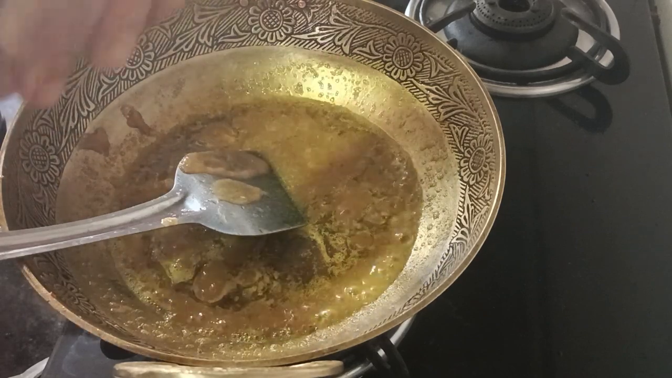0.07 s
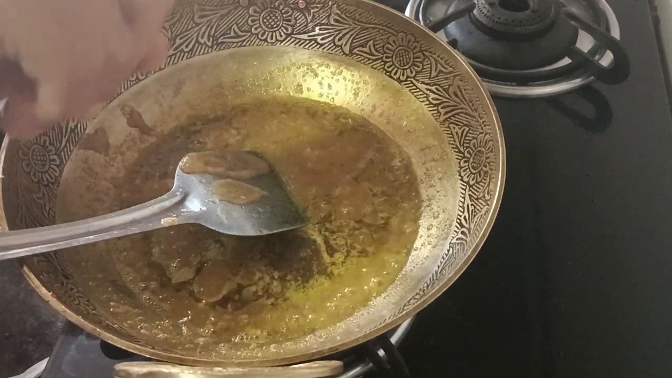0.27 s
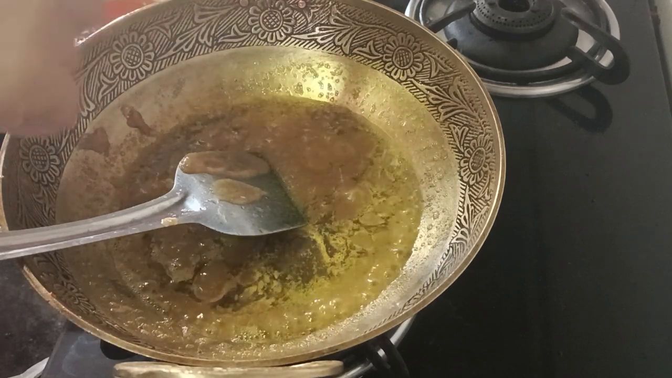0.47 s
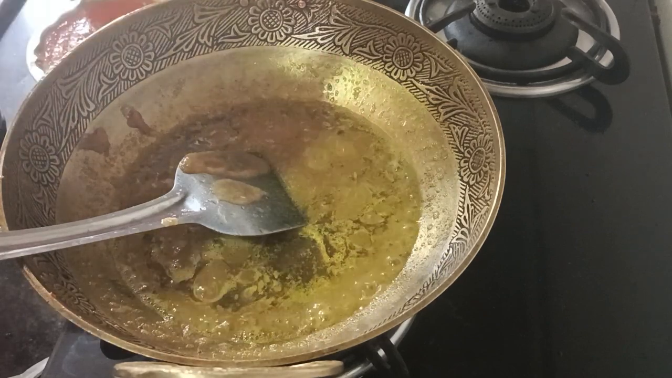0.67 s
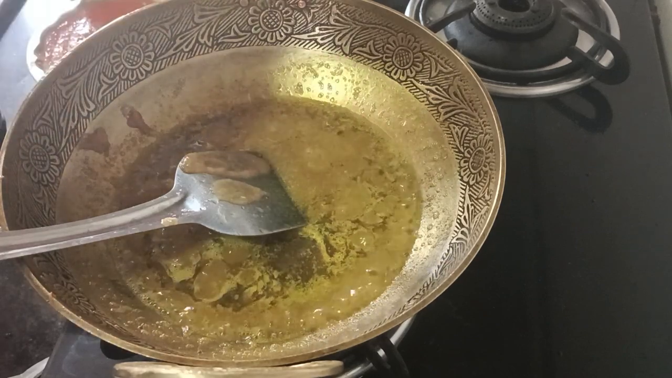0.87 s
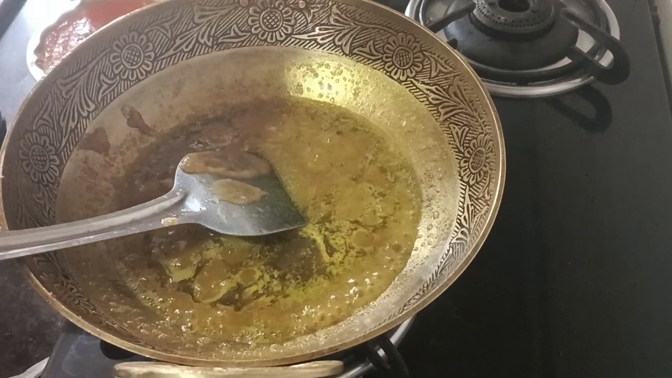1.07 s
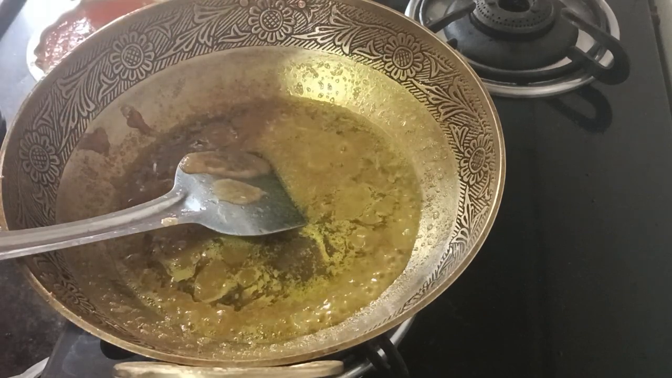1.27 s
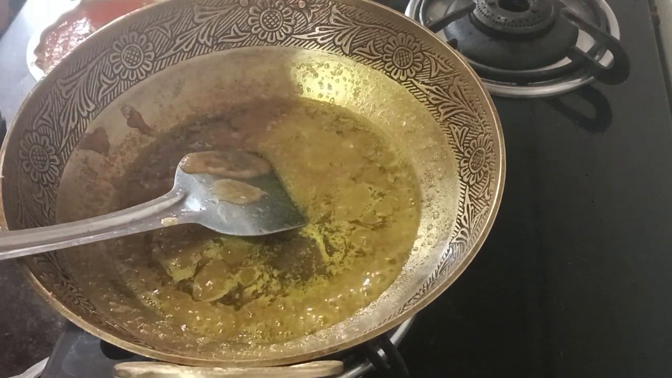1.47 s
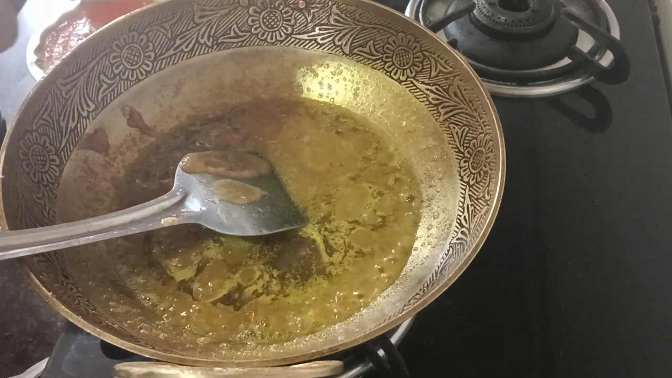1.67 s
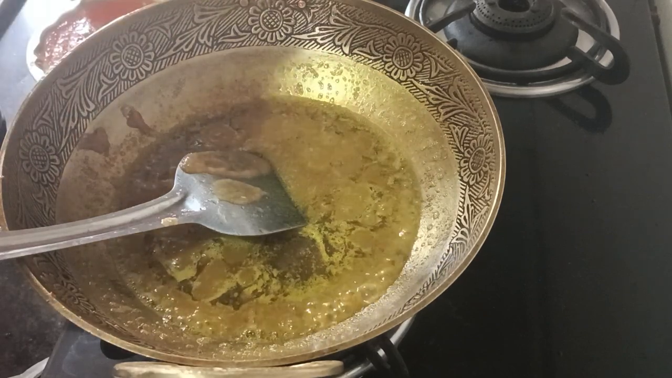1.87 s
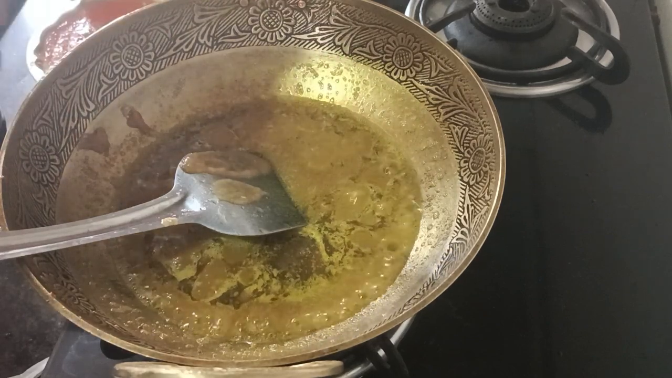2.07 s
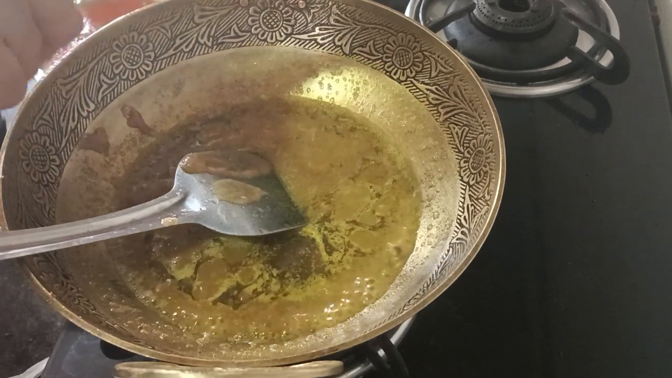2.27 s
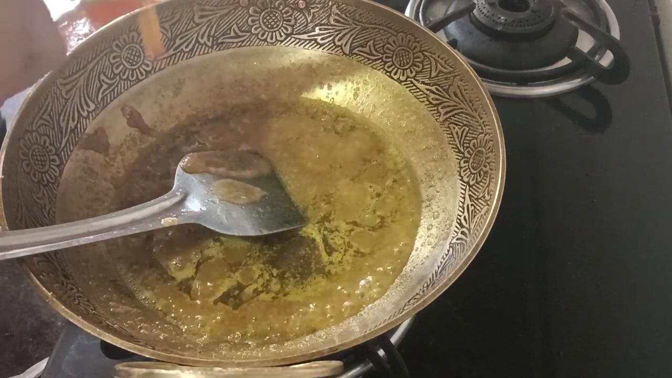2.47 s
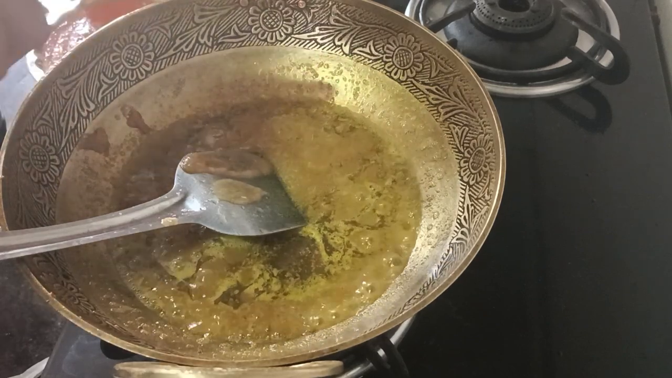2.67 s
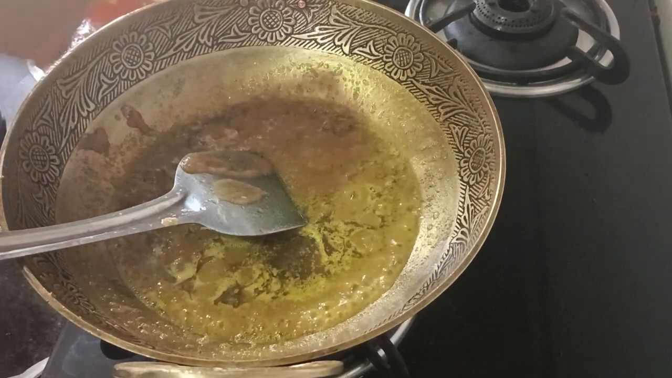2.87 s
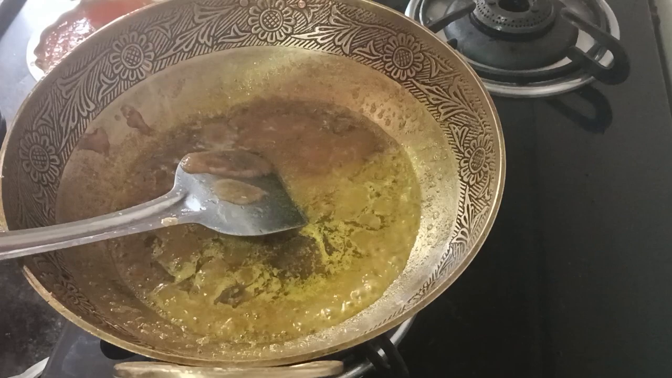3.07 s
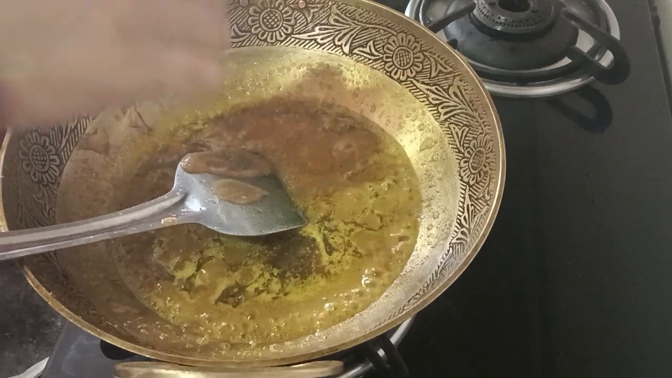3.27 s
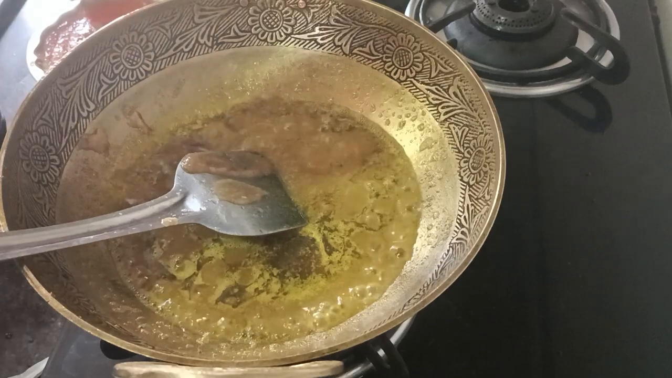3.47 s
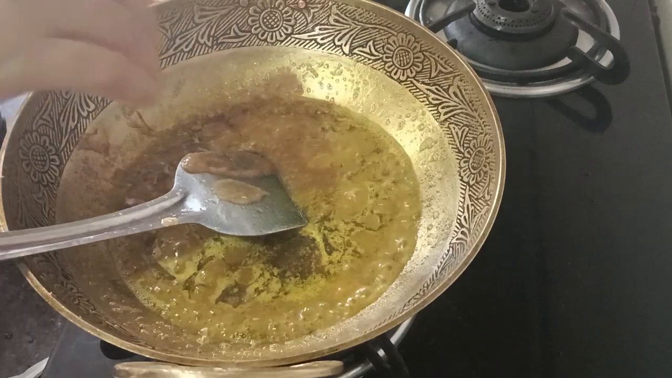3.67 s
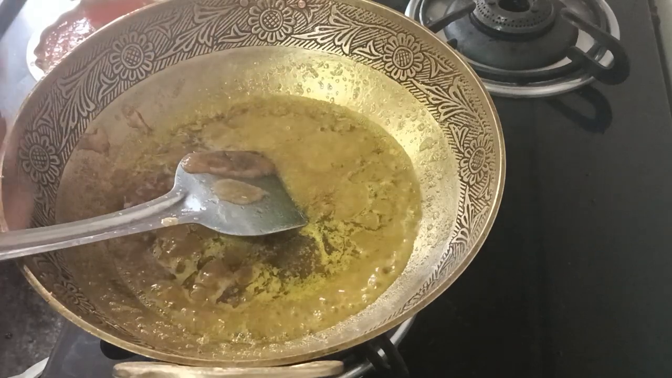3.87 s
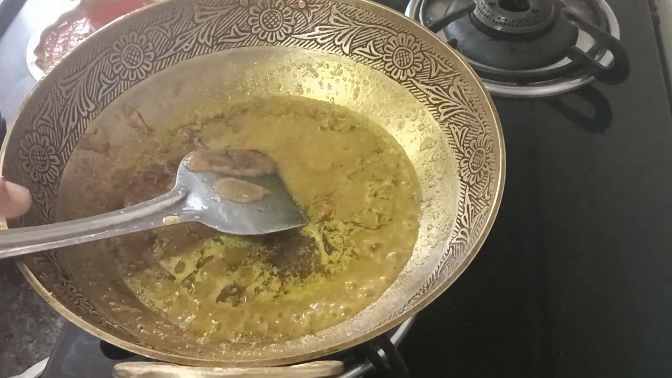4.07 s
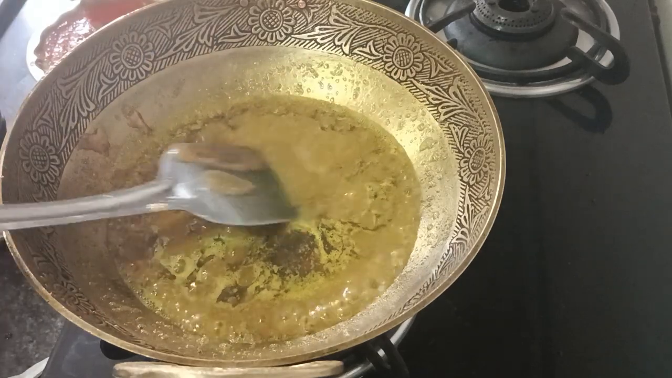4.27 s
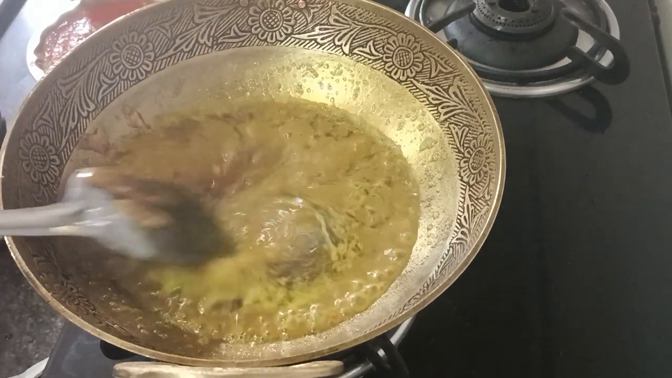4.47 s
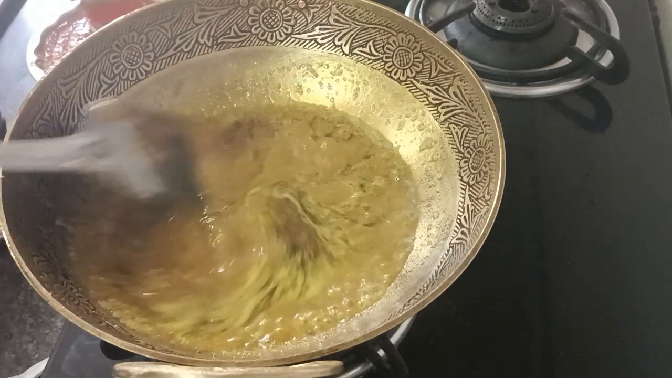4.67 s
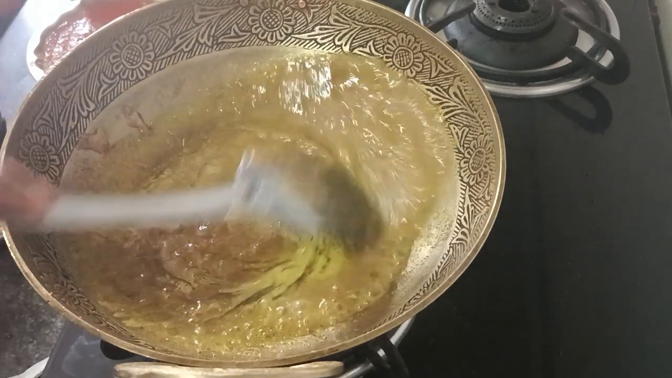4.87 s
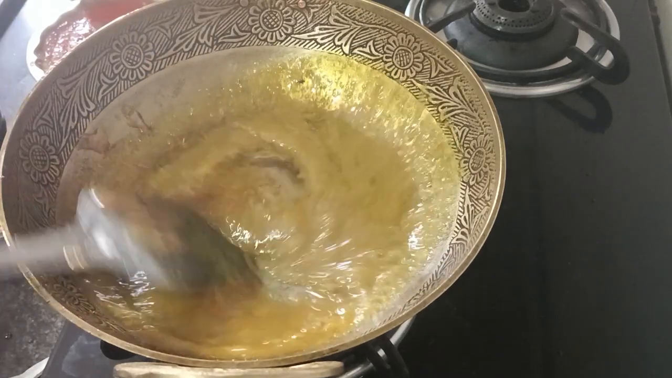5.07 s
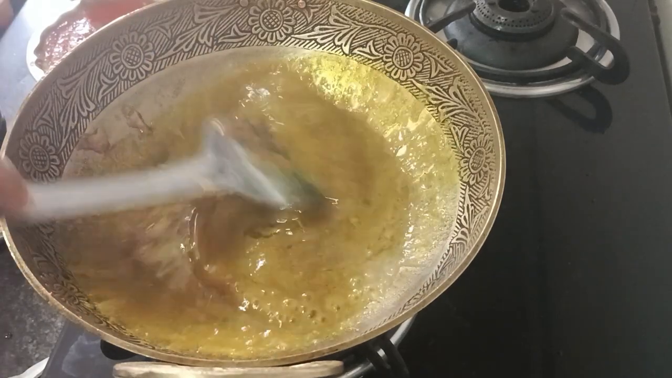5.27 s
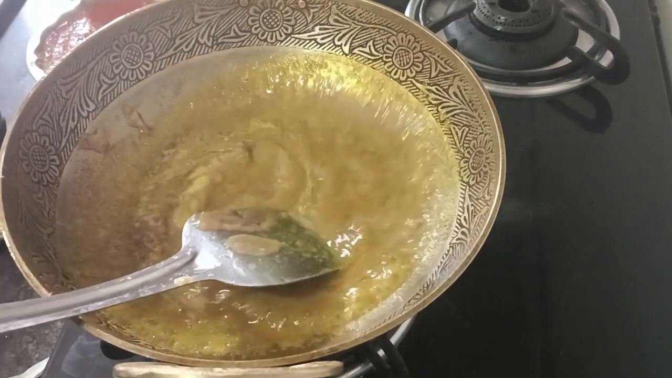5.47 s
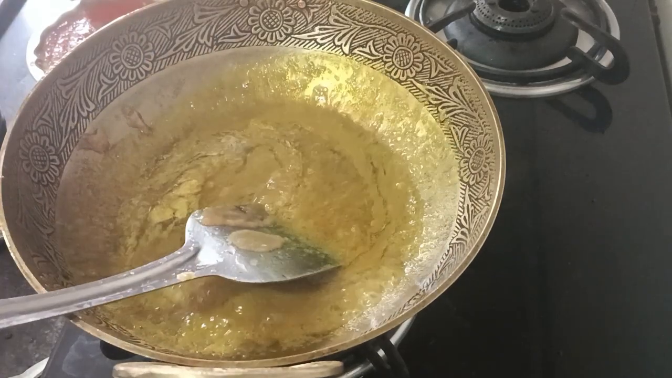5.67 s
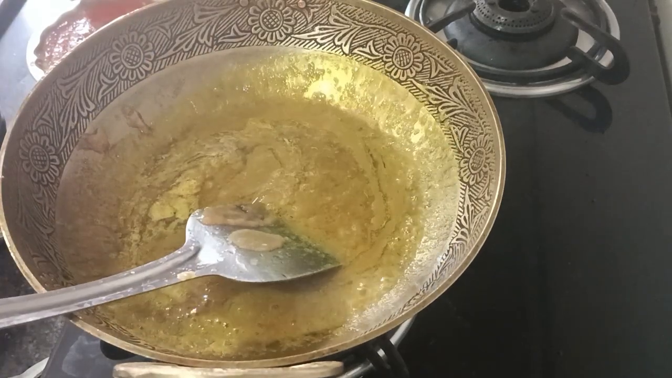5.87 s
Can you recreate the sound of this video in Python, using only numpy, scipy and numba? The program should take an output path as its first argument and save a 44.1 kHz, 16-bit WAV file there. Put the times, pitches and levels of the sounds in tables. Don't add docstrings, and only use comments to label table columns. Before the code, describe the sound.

A phone close above a stove hears thick spice paste boiling in oil in a brass pan, in stereo, with a short kitchen echo. From the start there is a dense, wet, slightly metallic sizzle, uneven and fluttering, with bright bubble pops clustered around 0.2 to 0.4 seconds and again near 2 and 3 seconds. Dry steam snaps and tiny high oil ticks scatter throughout. Below lie a soft gas roar and faint, dull thumps of the pan on its stand, one stronger near 2.8. The frying gradually thickens. From about 4.3 to 5.4 stirring brings rough surges of hiss, spitting and bubbling, strongest near 4.8, with a low thump. At 5.53 the ladle drops on the rim: a hard, bright metal clank, rapid bounces fading within about a tenth of a second, and a short ring. The ladle hums faintly in the continuing sizzle until the end at about 6 seconds.

```python
import sys
import numpy as np
from scipy import signal
from scipy.fft import rfft, irfft
from scipy.io import wavfile
from scipy.ndimage import uniform_filter1d
from numba import njit

SR = 44100
rng = np.random.default_rng(int(sys.argv[2]) if len(sys.argv) > 2 else 0)


def file_out(sig):
    cols = np.atleast_2d(sig).T
    lim = np.clip(cols, -1, 1)
    pcm = np.round(lim * 32767).astype(np.int16)
    wavfile.write(sys.argv[1], SR, pcm)


def volts_from_decibels(level):
    exponent = np.asarray(level, float) / 20
    return 10 ** exponent


N = 261072
TIME = np.arange(N) / SR
OPPOSITE = np.array([[1], [-1]])

# start_s, peak_db, hardness (0-1)
LADLE_BOUNCES = [(5.5302, -10.5, 1), (5.532, -11.5, 0.78), (5.5339, -10.5, .8), (5.538, -12.5, 0.47),
                 (5.547, -18, 0.32), (5.5543, -16, 0.31), (5.56, -16.5, 0.43), (5.5655, -16.5, 0.32),
                 (5.57, -20.5, 0.26), (5.5802, -22, 0.7), (5.583, -18.5, 0.59), (5.59, -30, 0.3),
                 (5.606, -22, .5), (5.6148, -22.5, .7), (5.627, -27, 0.65), (5.641, -27, 0.74)]


def set_level(x, db):
    return x * volts_from_decibels(db) / np.sqrt(np.mean(x ** 2))


def ring(x, hz, width):
    r = np.exp(-np.pi * width / SR)
    top = (1 - r * r) / 2
    return signal.lfilter([top, 0, -top], [1, -2 * r * np.cos(2 * np.pi * hz / SR), r * r], x)


def colour(x, hz, db):
    log_hz = np.log(np.maximum(np.fft.rfftfreq(N, 1 / SR), 1))
    return irfft(rfft(x) * volts_from_decibels(np.interp(log_hz, np.log(hz), db)), N)


def walk(rate):
    hold = int(SR / rate)
    steps = np.repeat(rng.standard_normal(N // hold + 1), hold)
    return 1.27 * uniform_filter1d(uniform_filter1d(steps, hold), hold)[:N]


@njit
def bursts(start, hz, cycles, size):
    out = np.zeros((2, N))
    for g in range(len(hz)):
        w = 2 * np.pi * hz[g] / SR
        p = np.exp(1j * w - hz[g] / (cycles * SR))
        for c in range(2):
            i = int(start[c, g]) + 1
            z = size[c, g] * p ** (i - start[c, g])
            for n in range(max(i, 0), min(N, i + int(6 * cycles * SR / hz[g]) + 2)):
                out[c, n] += z.imag
                z *= p
    return out


def scatter(s, hz, db, cycles, spread_s, balance_db):
    spot = rng.standard_normal((len(s), 2)).T
    left_lag_s = 4.48 / 44100 + spread_s * spot[0]
    side = np.array([[.5], [-.5]])
    return bursts((s + side * left_lag_s) * SR, hz, cycles, volts_from_decibels(db + side * balance_db * spot[1]))


def swarm(count, lo_hz, hi_hz, scatter_db, patchy_db, **grain):
    when, pitch, size = rng.random((count, 3)).T
    at = (when * (N - 1)).astype(int)
    low, high = (walk(14)[at] + walk(40)[at] for _ in range(2))
    flurry_db = patchy_db * (np.cos(pitch * np.pi / 2) * low + np.sin(pitch * np.pi / 2) * high)
    db = flurry_db - scatter_db * np.log(1.002 - size)
    hz = lo_hz * (hi_hz / lo_hz) ** pitch
    return set_level(scatter(when * N / SR, hz, db, **grain), 0)


def cluster(event_s, event_db, count, run_s):
    after, size = rng.random((len(event_s), count, 2)).T
    after[0] = 0
    s = event_s - run_s * np.log(1 - after) * (np.arange(count) > 0)[:, None]
    db = event_db - 6.0 * (s - event_s) / run_s - 6 * size
    return s.ravel(), db.ravel()


def struck(push, modes, longest_s):
    out = 0
    for k, (hz, db, t60_s) in enumerate(modes):
        t60_s = min(t60_s, longest_s)
        out = out + (-1) ** k * volts_from_decibels(db) * t60_s * ring(push, hz, 2.9 / t60_s)
    return out


def swell(s, hold_s, db, rise, fall):
    out = np.zeros(N // 64 + 2)
    t = np.arange(len(out)) * 64 / SR
    for start, hold, peak_db in np.broadcast(s, hold_s, db):
        climb_db = rise * np.maximum(start - t, 0)
        sink_db = fall * np.maximum(t - start - hold, 0)
        out += volts_from_decibels(2 * (peak_db - climb_db - sink_db))
    return np.interp(TIME, t, out)


def effort():
    # time_s, wall_db
    heat_points = [(0, -49.5), (.08, -63), (.16, -50.5), (.47, -50), (.66, -49), (.8, -47.5), (1.3, -48.5),
                   (2.0, -47.5), (2.8, -47.5), (3.3, -47), (4.1, -46), (4.45, -41), (4.7, -42.5),
                   (4.95, -40.5), (5.03, -46), (5.26, -40), (5.38, -45), (5.74, -44), (5.92, -50)]
    # start_s, hold_s, deep_db, middle_db
    steam_surges = [(.04, 0, -50.5, -55), (0.139, 0.11, -52, -56), (0.55, 0.047, -52.5, -74),
                    (.89, 0, -62, -52.5), (1.208, 0, -55.5, -51), (1.362, 0.041, -52.5, -53),
                    (1.627, 0.041, -52.5, -66), (1.858, 0.11, -52.5, -54), (2.238, 0.32, -59, -57.5),
                    (2.567, 0.034, -52, -50.5), (2.71, 0, -46, -52.5), (2.85, 0.19, -59, -54.5),
                    (3.07, 0, -63, -51.5), (3.245, 0.096, -49.5, -52.5), (3.5, 0.12, -50, -52.5),
                    (3.737, 0.1, -49.5, -51), (3.968, 0.012, -49, -48.5), (4.183, 0.16, -57, -53.5),
                    (4.57, 0.0046, -50, -55), (4.747, 0.0071, -70, -48.5), (4.84, 0.058, -45.5, -49),
                    (4.876, 0.005, -45, -47), (5.05, 0.012, -48, -56), (5.143, 0.02, -55, -50.5),
                    (5.24, 0, -57, -48), (5.544, 0.027, -45.5, -45)]
    # start_s, hold_s, wall_db, spit_db
    surface_flurries = [(.02, 0.026, -63, -74), (0.108, 0.027, -52.5, -69), (0.208, 0.02, -62, -73),
                        (0.317, 0.017, -51, -60), (1.398, 0.027, -46.5, -69), (1.585, 0.019, -53, -68),
                        (2.043, 0.026, -57, -55.5), (3.876, 0.062, -46.5, -72), (4.064, 0.02, -49, -67),
                        (0.564, 0.0036, -42, -50), (0.693, 0.0085, -52, -54.5), (0.9, 0.046, -49.5, -60),
                        (1.07, 0.018, -49, -60), (1.33, 0.088, -53.5, -54), (1.81, 0.29, -53.5, -72),
                        (2.72, 0.045, -49, -70), (2.934, 0.091, -46.5, -59), (3.39, 0.26, -48, -62),
                        (4.39, .01, -50, -52.5), (4.497, 0.035, -44, -50), (4.57, .1, -58, -65),
                        (5.154, 0.047, -45, -49), (5.304, 0.088, -62, -49), (4.76, 0.01, -40, -47.5),
                        (4.833, 0.07, -37.5, -47.5), (4.704, .02, -46, -60), (5.08, .01, -71, -66)]
    heat_db = np.interp(TIME, *np.transpose(heat_points))
    fry_db = -55 + .5 * TIME
    fry_db = fry_db + 6 * np.clip((TIME - 5.07) / 0.08, 0, 1)
    surge_s, surge_hold_s, deep, middle = np.transpose(steam_surges)
    flurry_s, flurry_hold_s, wall, oil = np.transpose(surface_flurries)
    layers = [(heat_db, flurry_s, flurry_hold_s, wall),
              (heat_db - 14, surge_s, surge_hold_s, deep),
              (heat_db - 12, surge_s, surge_hold_s, middle),
              (fry_db, flurry_s, flurry_hold_s, oil)]
    return [10 * np.log10(volts_from_decibels(2 * steady_db) + swell(*events, rise=198, fall=195))
            for steady_db, *events in layers]


def boil(wall_db, deep_db, middle_db):
    # pitch_hz, width_hz, left_db, right_db
    wall_modes = [(980, 1240, -10, -13), (1358, 87, -9, -2), (1441, 66, -9, 1.5), (1821, 37, -7, -2.5),
                  (2050, 71, 1, -2), (2518, 278, -9, -6), (2709, 138, -5, -5.5), (2874, 190, -10, -10.5),
                  (3240, 160, -15, -2), (3450, 158, -2.5, -4.5), (3780, 200, 0, -3.5), (4006, 192, -9, -1),
                  (4407, 280, -4, -8), (4705, 240, -15, -11.5), (5410, 200, -50, -16)]
    knocks = swarm(count=20000, lo_hz=900, hi_hz=6680, scatter_db=0.5, patchy_db=1.45,
                   cycles=1.19, spread_s=5e-5, balance_db=6.5)
    out = 0
    for hz, width, left_db, right_db in wall_modes:
        db = deep_db if hz < 1650 else middle_db if hz < 2250 else wall_db
        wander_db = 1.0 * walk(8.9) + 2.7 * walk(30)
        mode = ring(ring(knocks * volts_from_decibels(db + wander_db), hz, width), hz, 2.54 * width)
        out = out + volts_from_decibels(np.array([[left_db], [right_db]])) * mode * np.sqrt(hz / width)
    hum = set_level(ring(knocks, 3670, 80), -46) * (TIME > LADLE_BOUNCES[0][0])
    return out * volts_from_decibels(2.5) + hum


def pops():
    # start_s, peak_db, pitch_hz
    big_bubbles = [(0.103, -29, 4100), (0.174, -30, 3300), (0.2076, -21, 4030), (0.218, -27, 4270),
                   (0.3605, -26, 3920), (0.5163, -36, 2800), (.7582, -30.5, 2540), (1.1767, -34, 2630),
                   (1.3392, -42, 1480), (1.4686, -25, 3800), (1.7215, -32, 2050), (2.178, -34, 2590),
                   (2.5935, -38, 1460), (3.1158, -29, 2680), (3.181, -35, 3270), (3.4431, -33, 1490),
                   (3.9055, -29, 3980), (4.12, -29, 3820), (0.3017, -27.5, 3800), (0.5415, -55, 1460),
                   (0.942, -26, 3300), (1.321, -39, 1500), (1.8083, -26, 3320), (1.9493, -28.5, 2740),
                   (1.972, -25.5, 2840), (2.039, -24.5, 3780), (2.4058, -35, 1390), (2.9324, -27, 4000),
                   (2.971, -21.5, 3700), (3.2, -32, 2050), (3.3435, -33, 1490), (3.7253, -32, 3240),
                   (4.0371, -29, 2820), (4.243, -24, 4300), (4.305, -28, 2700), (4.575, -48, 1410),
                   (4.631, -25.5, 2620), (4.767, -23, 3660), (4.8314, -39, 3380), (5.0444, -63, 1400)]
    # start_s, peak_db, pitch_hz
    dull_bubbles = [
        (0.661, -44, 960),
        (2.05, -49.5, 980),
        (2.53, -60, 231),
        (2.88, -47, 237),
        (2.999, -51, 245),
        (3.556, -46, 1080),
        (4.92, -45, 870),
        (5.09, -46.5, 900),
    ]
    s, db, hz = np.transpose(big_bubbles)
    snap_db = db - 19 - 30 * np.log2(hz / 1400)
    snap = scatter(s, np.full(len(s), 2200.), snap_db, cycles=1.0, spread_s=3e-5, balance_db=21.0)
    s, db = cluster(s, db, count=6, run_s=0.0093)
    hz = np.tile(hz, 6) * (1 + .08 * rng.standard_normal(len(s)))
    sharp = scatter(s, hz, db - 7, cycles=6., spread_s=5e-5, balance_db=7)
    sharp = sharp + ring(snap, 2900, 2300)
    s, db, hz = np.transpose(dull_bubbles)
    s, db = cluster(s, db, count=8, run_s=0.047)
    hz = np.tile(hz, 8) * (1 + .03 * rng.standard_normal(len(s)))
    dull = scatter(s, hz, db - 1.5, cycles=6., spread_s=5e-5, balance_db=3)
    return sharp + ring(dull, 600, 1500)


def clicks():
    # start_s, peak_db, pitch_hz
    steam_pockets = [(0.1057, -45, 3960.0), (0.2092, -35.0, 4130.0), (0.2205, -41, 4130.0),
                     (0.3018, -39.0, 3400.0), (0.5177, -41.0, 2670.0), (0.9473, -37.0, 3360.0),
                     (0.9776, -40.0, 2580.0), (1.1782, -39, 2630.0), (1.1861, -43, 2630.0),
                     (1.3231, -40, 3830.0), (1.3423, -35, 1440), (1.368, -36, 3060.0),
                     (1.4424, -32, 3360.0), (1.6086, -37, 2580.0), (1.8109, -36, 3320.0),
                     (1.8505, -39.0, 3450.0), (1.9508, -28.5, 2710.0), (1.9742, -29, 2710.0),
                     (2.0362, -38.0, 3790.0), (2.0448, -29, 3530.0), (2.1218, -41.0, 4690.0),
                     (2.1804, -44, 2500.0), (2.2767, -33, 3360.0), (2.3005, -38, 3320.0),
                     (2.4091, -44, 1430), (2.6039, -33, 2650), (2.7941, -35, 2970.0), (2.9398, -35, 3830.0),
                     (2.9707, -31, 2640), (3.0287, -35, 1700), (3.0803, -39, 1930), (3.1176, -35, 2760.0),
                     (3.1283, -35, 2710.0), (3.2011, -32.5, 2800.0), (3.3077, -32.5, 1490),
                     (3.5179, -31, 1370), (3.7266, -34, 3270.0), (3.9073, -36.0, 3960.0),
                     (3.9717, -43, 1690), (4.0121, -32, 3320.0), (4.0378, -36.0, 2890.0),
                     (4.0506, -39, 2580.0), (4.1205, -34, 3830.0), (4.3089, -40, 2710.0),
                     (4.5111, -31, 3920.0), (4.5763, -34, 1550.0), (4.7278, -33.0, 3790.0),
                     (4.7671, -27, 3570.0), (5.353, -37, 3290), (5.4249, -30, 4250)]
    s, db, hz = np.transpose(steam_pockets)
    s = s - .0003
    tick = scatter(s, np.sqrt(hz * 2400), db - 1.5, cycles=.9, spread_s=2e-5, balance_db=2.5)
    body = scatter(s, hz, db - 2.5, cycles=4., spread_s=2e-5, balance_db=3.5)
    return volts_from_decibels(2.5) * ring(tick + body, 2950, 4000)


def spit(spit_db):
    # start_s, peak_db, pitch_hz
    oil_drops = [(0.065, -41.5, 8200), (0.3207, -38, 11200), (0.4165, -49, 10000), (0.6787, -44, 8400),
                 (0.771, -41, 14000), (1.065, -43, 10400), (1.3867, -46, 10600), (1.813, -40.5, 10600),
                 (1.871, -43, 7700), (1.971, -42, 10600), (2.0276, -39, 10600), (2.919, -47, 13500),
                 (2.1956, -43, 10100), (2.2693, -44, 10000), (2.4364, -42, 9050), (2.4776, -42, 9700),
                 (2.596, -42.5, 10700), (2.691, -46, 10700), (2.7196, -40.5, 10150), (2.836, -45, 8300),
                 (2.9657, -42, 7880), (3.086, -43, 7600), (3.247, -42.5, 10100), (3.419, -40, 10300),
                 (3.84, -39, 10400), (3.907, -40, 10300), (3.945, -48, 8000), (4.0805, -37.5, 10300),
                 (4.1515, -49, 8070), (4.187, -43, 7490),
                 (4.311, -38.5, 7500),
        (4.503, -47, 10300),
        (4.6804, -39.5, 10200),
        (4.958, -41, 7600),
        (5.071, -36, 10600),
        (5.4493, -36, 9900),
    ]
    fizz = swarm(count=40000, lo_hz=4290, hi_hz=17200, scatter_db=1.5, patchy_db=1.0,
                 cycles=0.96, spread_s=2.5e-5, balance_db=8.0)
    drop_s, drop_db, drop_hz = np.transpose(oil_drops)
    s, db = cluster(drop_s, drop_db, count=5, run_s=0.0032)
    hz = np.tile(drop_hz, 5) * (0.81 + 0.35 * rng.random(len(s)))
    ticks = scatter(s, hz, db + 5.5, cycles=3.0, spread_s=3e-5, balance_db=-2.0)
    s, db = cluster(drop_s, drop_db, count=150, run_s=0.017)
    hz = np.tile(drop_hz, 150) * (0.64 + 0.75 * rng.random(len(s)))
    spray = scatter(s, hz, db - 5.5, cycles=2.0, spread_s=4e-5, balance_db=10.0)
    oil = fizz * volts_from_decibels(spit_db + 1.5) + ticks + spray
    return colour(oil, [3240, 4150, 10000, 16000], [-35, 3.0, 0.5, 4.5])


def ladle():
    rim_hz = [1474, 1809, 2050, 2363, 2864, 3375, 3482, 3681, 3764, 4050, 4867, 4967, 7316, 8689]
    # level_db, t60_s
    rim_rings = [(-6, .3), (-6.5, .28), (-22, .3), (-3.5, .3), (-13, 0.19), (-2.5, .2), (-9, 0.12),
                 (-12, 0.17), (-11, .2), (-5, .2), (-18, .3), (-9.5, 0.093), (-23, .12), (-30, .3)]
    base_hz = [233, 311, 401, 737, 860, 990, 1136, 1200]
    # level_db, t60_s
    base_rings = [(-1.5, .2), (-1, 0.054), (-9, .15), (-4, .39), (-15, .2), (-16, .3), (-3.5, .25),
                  (-26, .3)]
    # pitch_hz, width_hz, level_db
    ladle_modes = [(1290, 300, -10), (1920, 110, -6), (3430, 230, 6), (3930, 380, -2), (4910, 220, 4),
                   (7200, 190, -2), (9100, 260, -29), (10300, 790, -6)]
    clatter_s, settle_s, settle_db = 0.0035, 0.045, -21
    s, db, hard = np.transpose(LADLE_BOUNCES)
    first = int(s[0] * SR) - 40
    after = TIME[first:] - s[:, None]
    bounce = volts_from_decibels(2 * db)[:, None] * (after > 0) * np.exp(-2 * np.abs(after) / clatter_s)
    settle = volts_from_decibels(2 * settle_db) * (after[0] > 0) * np.exp(-2 * after[0] / settle_s)
    body = np.sqrt(bounce.sum(axis=0) + settle)
    bright = np.sqrt(hard ** 2 @ bounce + 0.22 * settle)

    common, apart = rng.standard_normal(N), rng.standard_normal((2, N))
    grit = .7 * np.array([np.roll(common, 4), common]) + .7 * apart
    rattle = colour(grit, [500, 1100, 2000, 3500, 5000, 6200], [-27, -1, -2, 5.0, -2, -32])
    rattle = body * rattle[:, first:]
    hiss = bright * colour(grit, [4000, 4930, 6550, 10000, 15000], [-20, -0.5, -3.5, -22, -19])[:, first:]
    chatter = grit[:, first:]

    shove = scatter(s, 600 + 600 * hard, db - 28 * hard + 4.5, cycles=0.19, spread_s=0.00021, balance_db=4.0)
    shove = shove[:, first:] + volts_from_decibels(-15.5) * np.sqrt(settle) * chatter[0]
    bowl = sum(volts_from_decibels(mode_db) * ring(bright * chatter, hz, width) for hz, width, mode_db in ladle_modes)
    rim = struck(body * chatter, np.column_stack([rim_hz, rim_rings]), longest_s=0.23)
    base = struck(shove, np.column_stack([base_hz, base_rings]), longest_s=0.11)
    out = volts_from_decibels(29.5) * rim + volts_from_decibels(41.5) * base + bowl + volts_from_decibels(-6.5) * rattle + volts_from_decibels(-3.0) * hiss
    return np.pad(out, ((0, 0), (first, 0)))


def shake():
    # start_s, peak_db
    stand_thumps = [(.18, -43), (.38, -45.5), (.66, -46.5), (0.771, -48), (.97, -52), (1.05, -59),
                    (1.16, -77), (1.26, -61), (1.35, -59.5), (1.47, -57.5), (1.59, -53), (1.65, -42),
                    (1.8, -60), (1.86, -60), (2.05, -59), (2.21, -65), (2.34, -60), (2.47, -50.5),
                    (2.63, -62), (2.797, -39), (2.92, -59), (3.06, -51.5), (3.24, -48.5), (3.43, -47.5),
                    (3.72, -45.5), (3.89, -47), (4.32, -53), (4.6, -52), (4.793, -35.5), (4.9, -49.5),
                    (5.0, -50), (5.08, -52), (5.409, -39.5), (5.49, -45), (5.57, -46.5), (5.63, -46),
                    (5.7, -56)]
    # start_s, peak_db
    counter_thumps = [(0, -60), (.66, -55), (1.33, -57.5), (1.55, -67), (2.07, -69), (2.8, -58),
                      (1.65, -56), (1.84, -58.5), (2.34, -54), (3.26, -49.5), (3.74, -55), (4.22, -60),
                      (4.32, -51.5), (4.51, -52.5), (4.6, -52), (5.0, -49.5), (5.08, -48), (5.3, -52.5),
                      (5.41, -45), (5.47, -49), (5.54, -41), (5.62, -43), (5.711, -44.5), (5.8, -56)]
    # start_s, peak_db
    base_thumps = [(.18, -53), (.77, -60.5), (1.33, -67.5), (1.62, -54.5), (1.92, -62), (2.15, -62.5),
                   (2.3, -58.5), (2.41, -59), (2.54, -65.5), (2.93, -58.5), (3.77, -55), (4.9, -69),
                   (5.541, -57), (5.6, -62), (5.92, -59)]
    # width_hz, rise_db_per_s, fall_db_per_s, rest_db
    drum_settings = [(19.7, 325, 480, -65.5), (39.95, 239, 304, -71.5), (23.8, 406, 500, -75)]
    drum_hz = [134, 82, 325]
    both = 0
    thumps = (stand_thumps, counter_thumps, base_thumps)
    for hz, (width, rise, fall, rest_db), events in zip(drum_hz, drum_settings, thumps):
        s, db = np.transpose(events)
        noise = rng.standard_normal((2, N))
        murmur, apart = set_level(ring(ring(noise, hz, width), hz, 2.0 * width), 0)
        wobbling_hz = hz + 0.36 * width * walk(25)
        drum = np.sqrt(2) * np.sin(2 * np.pi * np.cumsum(wobbling_hz) / SR)
        push = np.sqrt(swell(s, 0, db, rise, fall))
        both = both + drum * push * volts_from_decibels(1.1 * walk(30))
        both = both + murmur * volts_from_decibels(rest_db + 2.5 * walk(5.4))
        both = both + volts_from_decibels(-25) * apart * push * OPPOSITE
    return both * volts_from_decibels(np.array([[-.7], [.7]]))


def flame():
    # pitch_hz, level_db (per Hz)
    roar_points = [(15, -53), (35, -31), (123, -3.5), (189, -9.5), (280, -14), (332, -23), (401, -36),
                   (537, 4.5), (615, -12.5), (671, -25.5), (1160, -8), (1400, -82), (1500, -6), (1950, -36),
                   (3300, -120)]
    roar_hz, roar_db = np.transpose(roar_points)
    out = 0
    for hz in 30 * 2 ** np.arange(0, 5.6, 1 / 3):
        mid, side = ring(rng.standard_normal((2, N)), hz, hz / 5)
        db = np.interp(np.log(hz), np.log(roar_hz), roar_db) + 3.0 * walk(9)
        out = out + volts_from_decibels(db) * (mid + min(hz / 1140.0, 1) * side * OPPOSITE)
    return out * volts_from_decibels(-63.5) / np.std(ring(out[0], 540, 930))


@njit
def walls(x, lags, gain, damp):
    line, soft, out = np.zeros((8, 4096)), np.zeros(8), np.zeros((2, len(x)))
    for i in range(len(x)):
        total = 0.
        for k in range(8):
            soft[k] += (1 - damp) * (gain[k] * line[k, (i - lags[k]) & 4095] - soft[k])
            total += soft[k]
            out[k % 2, i] += soft[k]
        for k in range(8):
            line[k, i & 4095] = x[i] + soft[k] - total / 4
    return out


def scene():
    wall_db, deep_db, middle_db, spit_db = effort()
    stove = boil(wall_db, deep_db, middle_db) + pops() + clicks() + spit(spit_db) + ladle()
    lags = rng.integers(500, 2200, 8)
    t60_s = 0.22
    room = walls(stove.mean(axis=0), lags, volts_from_decibels(-60 * lags / SR / t60_s), 0.054)
    return stove + volts_from_decibels(-7.5) * room + shake() + flame()


def band_limit(x):
    return signal.sosfilt(signal.butter(12, 16950, fs=SR, output="sos"), x)


def record(dry):
    # pitch_hz, left_db, right_db
    port_points = [(3700, -0.5, 0), (5270, 2.5, 2), (7040, -2.5, 2), (7700, 3.5, 4), (8950, -8, 7),
                   (8870, 0, 0), (9800, 9.5, -20), (10600, 10.5, 8), (10930, 6.5, -8), (11850, 2.5, -12),
                   (12600, 1, 3), (14300, 4, 0.5), (16000, 6.5, -2)]
    # pitch_hz, width_hz, left_depth (0-1),
    # right_depth (0-1)
    narrow_notches = [(2230, 110, .6, .65), (3020, 110, .65, .7), (5160, 200, .65, .55),
                      (6150, 240, .7, .75), (9370, 150, 1, .4), (11340, 150, .8, .1), (12200, 250, .35, .35)]
    hz, *port_db = np.transpose(port_points)
    x = np.array([colour(c, hz, db) for c, db in zip(dry, port_db)])
    for notch_hz, width, *depth in narrow_notches:
        moving_depth = np.clip(np.array(depth)[:, None] + .4 * walk(7), 0, 1)
        x = x - moving_depth * ring(x, notch_hz, width)
    x = signal.sosfilt(signal.ellip(10, .2, 45, 15750, fs=SR, output="sos"), x)
    return band_limit(x)


dry = scene()
out = record(dry)
file_out(out)
```